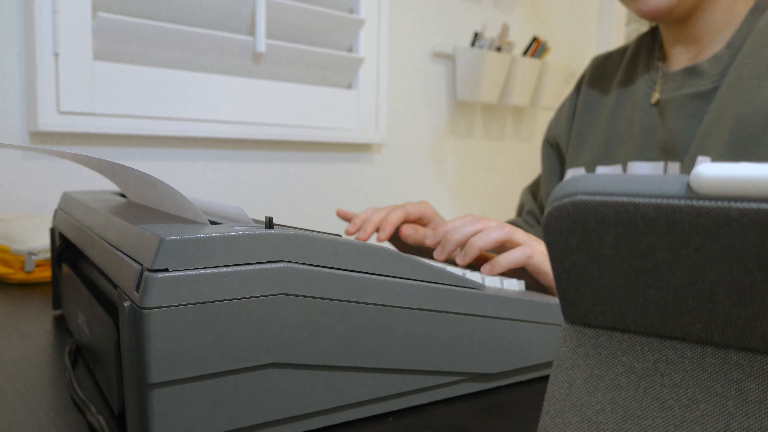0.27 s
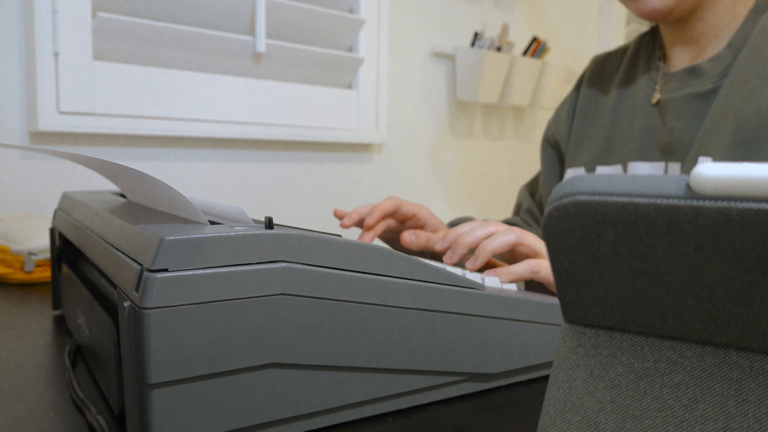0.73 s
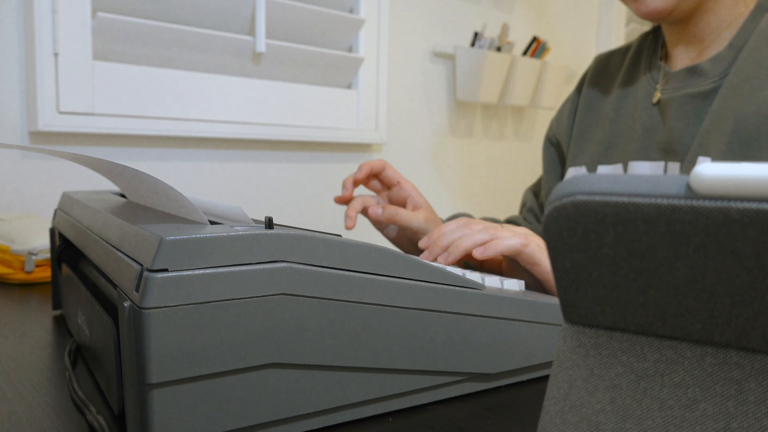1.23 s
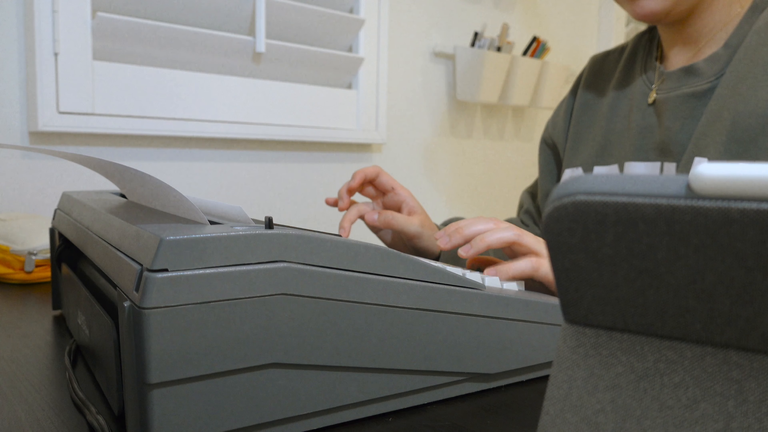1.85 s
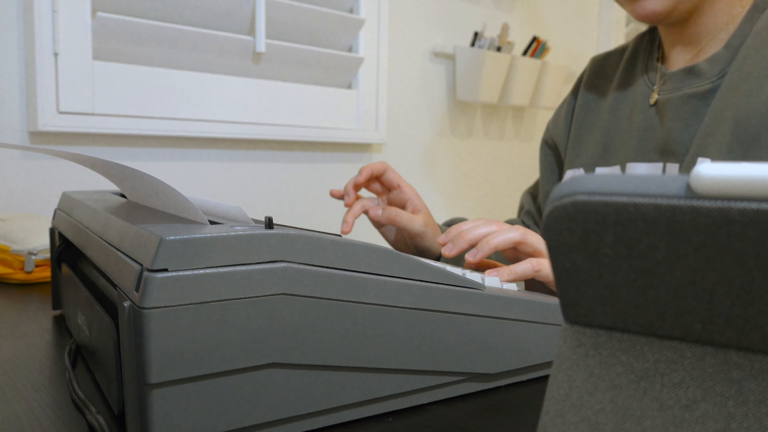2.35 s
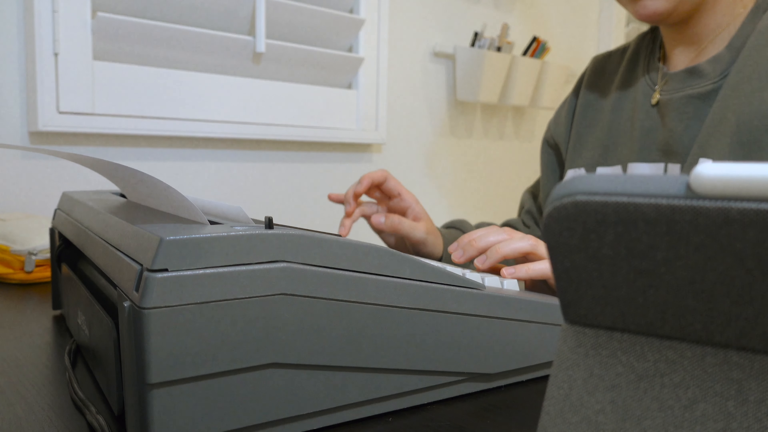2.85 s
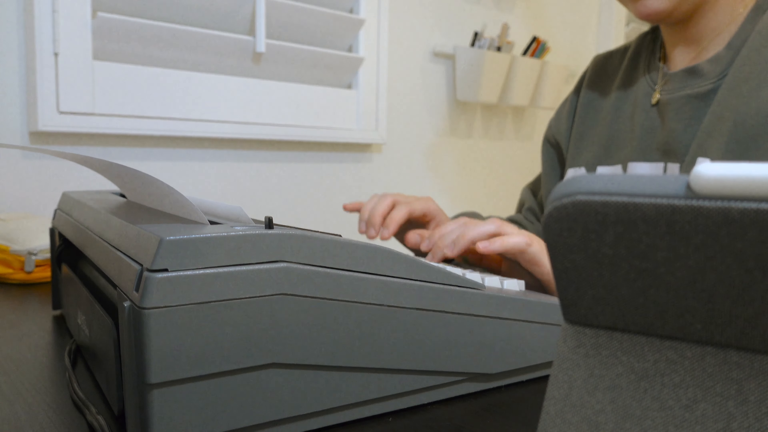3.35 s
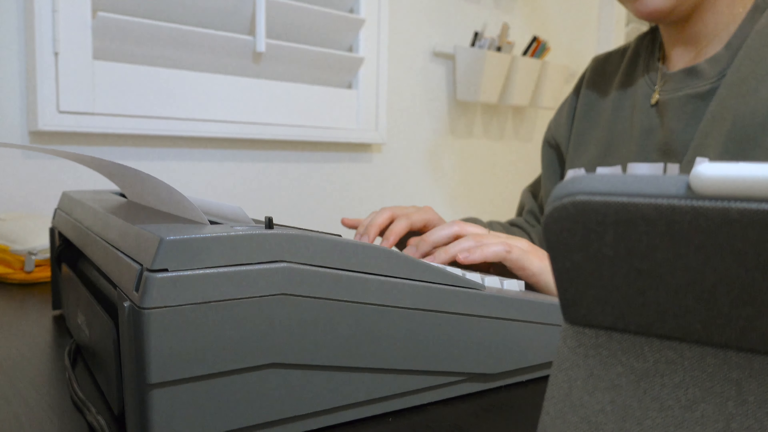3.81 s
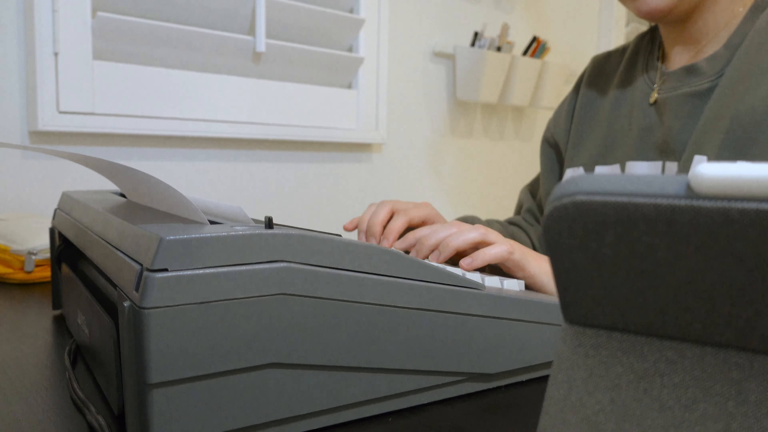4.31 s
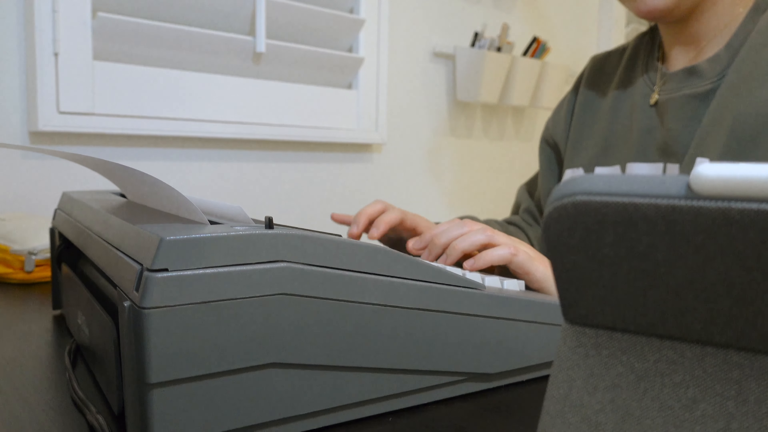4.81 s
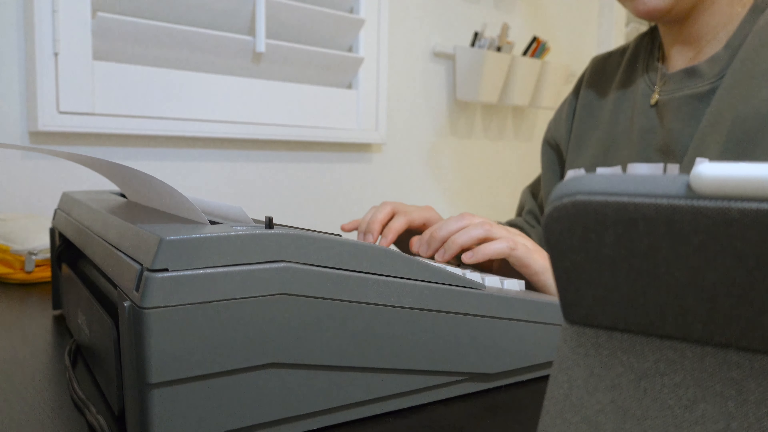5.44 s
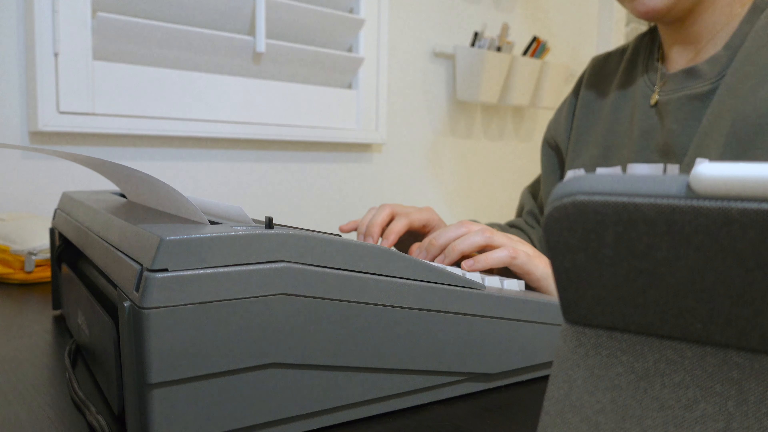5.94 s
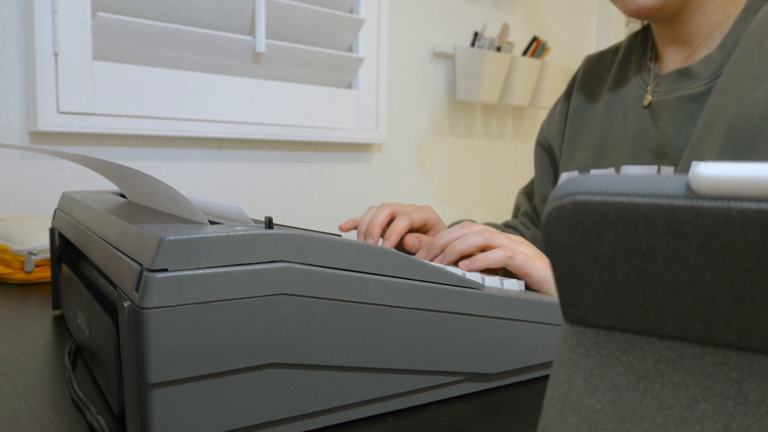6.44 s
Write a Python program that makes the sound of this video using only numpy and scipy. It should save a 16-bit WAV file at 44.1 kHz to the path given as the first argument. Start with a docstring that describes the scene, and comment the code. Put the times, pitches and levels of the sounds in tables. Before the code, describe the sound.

An electric typewriter strikes once, pauses with soft key clicks, then clatters through a quick, uneven run of letters in a small quiet room.

```python
"""A small quiet room, with an electric typewriter on a desk close to a stereo microphone.
Keys click; the hammer strikes and rebounds. Each impact excites damped modes of the casing and
desk, and a rattle of modes too dense to resolve. A stepper motor moves the carriage on with a
buzzing train of pushes. The room reverberates, and a rod in the machine keeps ringing through
the pauses, over a faint hush."""
import sys
import numpy as np
from scipy import signal
from scipy.fft import rfft, irfft, next_fast_len
from scipy.io import wavfile
from scipy.ndimage import uniform_filter1d

SR = 44100
rng = np.random.default_rng(int(sys.argv[2]) if len(sys.argv) > 2 else 0)


def write(x):
    x = np.atleast_2d(x).T
    wavfile.write(sys.argv[1], SR, np.round(np.clip(x, -1, 1) * 32767).astype(np.int16))


N = 294147
LEAD = SR // 4  # samples computed before the scene opens
EARLY_BLOW_S = -.13  # this blow is still dying away at the opening

# hammer blows: start_s, strength_db, ring_high_hz, ring_low_hz
BLOWS = [(0.8707, -0.15, 2860, 1853), (3.1664, -2.04, 3067, 1200), (3.3824, .3, 2940, 1660),
         (3.8566, -0.32, 2846, 2024), (4.014, 0.83, 2823, 1754), (4.1504, 0.6, 2590, 1752),
         (4.2731, 0.1, 2616, 2040), (4.372, 0.69, 2670, 1235), (4.7606, 0.37, 2898, 1724),
         (4.9436, -.2, 2600, 1760), (5.041, 0.16, 2540, 1737), (5.3126, -0.22, 2597, 1694)]
# the contacts of one blow: delay_s, casing_db, thud_db, knock_db, crack_db, contact_s
STROKE = [(0, -1.5, -1.5, -5.5, -2, 0.0011), (.009, -4.5, 0.5, -0.5, -9.5, 0.0014),
          (0.0193, -13.5, -2, -11.5, -9, 0.00064), (0.0236, -4, -9.5, -11.5, -5, 0.0018),
          (0.051, -7.5, -7.5, -13, -12, 0.0023), (.06, -15.5, -20.5, -16, -14, 0.00077),
          (0.073, -13.5, -22, -11.5, -18.5, 0.0023)]
# keys and small parts: start_s, casing_db, pitch_hz, knock_re_casing_db, crack_re_casing_db
CLICKS = [(0.118, -37.5, 3340, -15, -5.5), (0.1278, -28.5, 3280, -11.5, -17), (0.2224, -35, 3410, -5, -12),
          (0.3043, -40, 3340, -21, -4.5), (0.6135, -43.5, 1710, -17, -8), (0.6325, -37, 3200, -13.5, -21.5),
          (0.6462, -25, 2264, -21.5, -13.5), (0.677, -33, 2000, -20.5, -14.5), (0.77, -31, 3170, -24, -5.5),
          (0.7831, -18.5, 2610, -24, -16), (0.8192, -18.5, 2800, -20.5, -13), (0.9745, -26, 898, -10, -29),
          (1.2464, -38.5, 2780, -15.5, -15.5), (1.598, -50.5, 1980, -15, -23), (1.822, -56, 2460, -7, -23),
          (1.8844, -46.5, 2310, -10, -15), (1.91, -33.5, 3260, -16, -27), (1.923, -31, 2810, -15, -16),
          (1.9705, -33, 2320, -13, -19), (2.376, -48.5, 3420, -8, -24), (2.399, -52.5, 2310, 1, -27),
          (2.4975, -37.5, 890, -7, -22), (2.552, -53, 920, -10, -18), (2.6574, -60, 904, -9, -15),
          (3.0791, -26, 2713, -31.5, -13.5), (3.0866, -17.5, 2913, -26, -11),
          (3.1154, -21.5, 2870, -17.5, -12.5), (3.3187, -17, 3280, -19, -2.5), (3.3327, -19, 3465, -18, -8),
          (3.5277, -22.5, 3360, -20, -15.5), (3.6076, -28.5, 2990, -10, -10), (3.7554, -53, 2950, -7, 0.5),
          (3.7933, -37, 1880, -13, -20), (3.8012, -22.5, 2730, -20.5, -13.5), (4.563, -30, 3900, -17, -7),
          (4.6759, -14.5, 3206, -27.5, -11), (4.6881, -24, 2956, -12.5, -4.5),
          (4.7083, -23.5, 2840, -13.5, -19.5), (4.857, -18.5, 3430, -14, -9),
          (4.8642, -18, 3910, -25.5, -7.5), (4.892, -16, 2850, -25, -10.5), (4.907, -19, 3100, -20.5, -12),
          (5.2584, -24, 2650, -12.5, -11), (5.8967, -56, 3320, -1.5, -24), (5.936, -52.5, 1520, -6, -24),
          (5.957, -50.5, 2240, -4, -22), (5.977, -47.5, 2870, 3.5, -9), (6.0914, -42, 3350, -12, -4),
          (6.097, -32.5, 3220, -13, -6)]
BLOW_DB = (-9, -27, -27.5, -17)  # the four parts: casing, thud of desk, knock of platen, crack of type
CLICK_THUD_DB, CLICK_CONTACT_S = -3, .0009  # thud relative to knock; length of the touch
def impacts():
    """Impact excitation: blows and clicks feed power to four parts and impulses to casing and desk."""
    blow_power, click_power = np.zeros((2, 4, N + LEAD))
    kicks = np.zeros((2, N + LEAD))
    for start_s, db, *_ in [(EARLY_BLOW_S, 0)] + BLOWS:
        for delay_s, *parts_db, contact_s in STROKE:
            add_contact(blow_power, kicks, start_s + delay_s, db + np.add(BLOW_DB, parts_db), contact_s)
    for start_s, db, _, knock_db, crack_db in CLICKS:
        levels_db = db + np.array([0, knock_db + CLICK_THUD_DB, knock_db, crack_db])
        add_contact(click_power, kicks, start_s, levels_db, CLICK_CONTACT_S)
    return blow_power, click_power, kicks


def add_contact(power, kicks, start_s, levels_db, contact_s):
    """Finite contact time: energy enters each part as a pulse, slowest for thud, fastest for crack."""
    t = np.arange(1500) / SR
    pulse = t * np.exp(-t / (contact_s * np.array([[1], [2.5], [1.5], [.3]])))
    at = LEAD + round(start_s * SR)
    power[:, at:at + len(t)] += gain_of(2 * levels_db)[:, None] * pulse / pulse.sum(axis=1, keepdims=True)
    kicks[:, at + round(contact_s * SR)] += gain_of(levels_db[:2])


def metallic_rings():
    """Free vibration: each click and each blow rings briefly at a bright, metallic pitch."""
    # start_s, level_db, pitch_hz, t60_s, rise_s; a click lasts 115 cycles
    rings = [(start_s, db - 3.5, hz, 115 / hz, CLICK_CONTACT_S) for start_s, db, hz, *_ in CLICKS]
    for start_s, strength_db, high_hz, low_hz in BLOWS:
        db = BLOW_DB[0] + strength_db
        rings += [(start_s, db - 7.5, high_hz, .1, .0012),
                  (start_s + .008, db - 11.5, low_hz, .062, .004),
                  (start_s + STROKE[3][0], db - 7, 1.2 * high_hz, .04, .0006)]  # the rebound
    out, t = np.zeros((2, N + LEAD)), np.arange(6000) / SR
    stereo_lags_s = .00009 * rng.uniform(-0.6, 1, len(rings))
    for (start_s, db, hz, t60_s, rise_s), lag_s in zip(rings, stereo_lags_s):
        envelope = gain_of(db - 60 * t / t60_s) * (1 - np.exp(-t / rise_s))
        at = LEAD + round(start_s * SR)
        out[:, at:at + len(t)] += envelope * np.sin(2 * np.pi * hz * (t + np.array([[0], [lag_s]])))
    return out


# spectra of the dense modes of casing, desk, platen and type: frequency_hz, relative_density_db
CASING_SPECTRUM = [(900, -36), (1500, -10.5), (1750, -6.5), (2200, -6), (2480, -4.5), (2610, -1.5),
                   (2720, -2), (2820, 1), (3000, -3.5), (3400, -1), (3900, -4), (4700, -11.5), (6000, -39)]
THUD_SPECTRUM = [(30, -30), (70, -22.5), (110, -18.5), (140, -1), (175, -18.5), (225, -4.5), (280, -7.5),
                 (320, -2.5), (355, -1), (400, -10), (450, 3), (520, -7.5), (620, -7.5), (900, -36)]
KNOCK_SPECTRUM = [(500, -29.5), (700, 0.5), (900, -2.5), (1200, 1), (1400, -5.5), (1900, -30.5)]
CRACK_SPECTRUM = [(3000, -22.5), (4500, 1), (6000, -1), (8200, -4.5), (10000, -5), (13000, -9),
                  (15500, -13), (17000, -37)]
# the same four parts: level_db, t60_s, room_db, room_t60_s, gear_noise_db, grain_db, low_cut_hz
PARTS = [(-8.5, 0.11, -11.5, 0.58, -8.5, -0.5, 900), (-0.5, 0.061, -9.5, 0.48, 1, 1.7, 18),
         (-2.5, 0.11, -9, .5, -10, 2.7, 440), (3, 0.065, -13.5, 0.46, -25, 2, 3300)]
SNAP_DB, SNAP_T60_S = 4.5, .007  # the first instant of a contact, over the rattle
AIR_DB_PER_KHZ = -0.44  # reflections come back duller
def rattle(blow_power, click_power, push):
    """Modal overlap: dense modes merge into a grainy, fast-dying noise with a smoother room tail."""
    out, size = 0, N + LEAD
    spectra = CASING_SPECTRUM, THUD_SPECTRUM, KNOCK_SPECTRUM, CRACK_SPECTRUM
    for blows, clicks, spectrum, part in zip(blow_power, click_power, spectra, PARTS):
        db, t60_s, room_db, room_t60_s, gear_db, grain_db, low_cut_hz = part
        heavy = gain_of(2 * db) * blows + gain_of(2 * (gear_db - 20)) * push ** 2
        light = gain_of(2 * db) * clicks
        grain = uniform_filter1d(rng.standard_normal(size), size=30)
        snap = gain_of(2 * SNAP_DB) * decay(heavy + light, SNAP_T60_S, rise_s=.00046)
        energy = snap + decay(heavy, t60_s, rise_s=.0014) + decay(light, t60_s, rise_s=.0013)
        direct = np.sqrt(energy) * gain_of(grain_db * grain / grain.std())
        direct = direct * stereo_noise(size, spectrum, COHERENCE)
        duller = [(hz, density_db + AIR_DB_PER_KHZ * hz / 1000) for hz, density_db in spectrum]
        reflected = gain_of(room_db) * np.sqrt(decay(heavy + light, room_t60_s, ROOM_RISE_S))
        reflected = reflected * stereo_noise(size, duller, COHERENCE)
        out = out + high_pass(direct + reflected, low_cut_hz, order=4)
    return out


# resonances of the casing: pitch_hz, relative_level_db, t60_s
CASING_MODES = [(907, -14.5, 0.1), (1226, -16.5, 0.13), (1712, -8.5, 0.066), (1984, -14.5, 0.094),
                (2450, -18, 0.054), (2664, 3, 0.03), (2900, -8, .06), (3175, -2.5, 0.047),
                (3270, -7.5, .04)]
def casing_ring(kicks):
    """Impulse response: every contact sets the high modes of the casing ringing."""
    return resonate(gain_of(10.5) * kicks[:1], CASING_MODES, rise_s=.00023)


# resonances of the desk: pitch_hz, relative_level_db, t60_s
DESK_MODES = [(124, -14, 0.072), (221, -9.5, 0.099), (281, 0, 0.15), (355.5, -5, 0.3), (446, -2, 0.12),
              (504, -8, 0.28), (597, -3, .07)]
def desk_ring(kicks, push):
    """Structure-borne sound: contacts and motor pushes drive the low modes of the desk."""
    force = gain_of(22) * kicks[1:] + gain_of(-20.5) * push
    return resonate(force, DESK_MODES, rise_s=.01)


# carriage moves with no blow: start_s, level_db
SPACES = [(.135, -35), (3.525, -33), (4.475, -34), (5.135, -34.5), (5.978, -36)]
ADVANCE_DELAY_S, ADVANCE_DB = .004, -35  # the move after each blow
MOVE_S, MEAN_STEP_HZ, HUM_DB = .088, 137.5, -7  # hum relative to push
def stepper_motor():
    """Periodic forcing: the motor jerks the carriage on with a train of pushes and hums at their rate."""
    blow_times_s = [EARLY_BLOW_S] + [row[0] for row in BLOWS]
    moves = SPACES + [(start_s + ADVANCE_DELAY_S, ADVANCE_DB) for start_s in blow_times_s]
    push, hum = np.zeros((2, N + LEAD))
    t = np.arange(round(MOVE_S * SR)) / SR
    steps = MEAN_STEP_HZ * t * (1 - 0.085 * (t / MOVE_S - 1))  # the steps slow a little
    for start_s, db in moves:
        envelope = gain_of(db) * signal.windows.tukey(len(t), .3)
        at = LEAD + round(start_s * SR)
        push[at:at + len(t)] += envelope * np.exp(-(steps % 1) / 0.13)
        hum[at:at + len(t)] += gain_of(HUM_DB) * envelope * np.sin(2 * np.pi * steps)
    return push, hum


# jolts that set the rod ringing anew: start_s, level_db, loss_db_per_s
ROD_JOLTS = [(0.0, -63, 16.5), (0.9, -52, 15), (2.0, -65.5, 38), (2.4, -66, 30), (2.66, -80, 35.5),
             (3.4, -49.5, 14), (4.4, -58.5, 50.5), (5.33, -52, 17), (6.05, -59, 32)]
ROD_HZ, ROD_RISE_S = 364.4, .03
def rod():
    """Light damping: one mode decays slowly from each jolt to the next; its level wavers a little."""
    t = np.arange(N) / SR
    jolts = np.transpose(ROD_JOLTS)
    latest = np.maximum(np.searchsorted(jolts[0], t) - 1, 0)
    start_s, db, loss_db_per_s = jolts[:, latest]
    level = uniform_filter1d(gain_of(db - loss_db_per_s * (t - start_s)), size=round(ROD_RISE_S * SR))
    waver_db = 0.5 * sum(np.sin(2 * np.pi * (hz * t + rng.random())) for hz in np.geomspace(3, 25, 8))
    return level * gain_of(waver_db) * np.sqrt(2) * np.sin(2 * np.pi * ROD_HZ * t)


# left-right likeness of the machine and its reflections: frequency_hz, correlation
COHERENCE = [(60, 1), (200, .999), (400, 1), (700, 0.92), (1500, 0.61), (3000, 0.54), (5000, -0.49),
             (9000, 0.37), (15000, -0.7)]
ROOM_T60_S, ROOM_RISE_S = .37, .019  # the rise lasts until the reflections are dense
def room(sound):
    """Reverberation: diffuse reflections give the clear modes an exponentially decaying tail."""
    t = np.arange(SR // 2) / SR
    white = stereo_noise(len(t), [(20, 0), (20000, 0)], COHERENCE)
    tail = white * gain_of(-60 * t / ROOM_T60_S) * (1 - np.exp(-t / ROOM_RISE_S))
    tail = high_pass(tail, 170)  # thin walls let the bass out
    return convolve(sound.mean(0)[None], tail)


# background noise of the room: frequency_hz, relative_density_db
HUSH_SPECTRUM = [(35, -63), (60, -47), (323, -11.5), (354, -2.5), (398, -16), (682, -14.5), (822, -2.5),
                 (1250, -15.5), (1470, -8.5), (1580, -11), (3760, -19.5), (5460, -19.5), (16000, -23.5)]
# its left-right likeness: frequency_hz, correlation
HUSH_COHERENCE = [(100, 0.96), (400, 0.54), (800, .2), (1500, .01)]
def hush():
    """Stationary noise: a faint, steady floor under the machine."""
    return gain_of(-64.5) * stereo_noise(N, HUSH_SPECTRUM, HUSH_COHERENCE)


def gain_of(db):
    """Decibels to amplitude ratio; doubling the decibels gives the power ratio."""
    return 10 ** (np.asarray(db) / 20)


def curve_at(points, hz):
    """Interpolation on a logarithmic frequency axis."""
    points_hz, values = np.transpose(points)
    return np.interp(np.log(hz + 1), np.log(points_hz + 1), values)


def high_pass(sound, hz, order=2):
    """Butterworth filtering: the level falls away below the cutoff."""
    return signal.sosfilt(signal.butter(order, hz, "high", fs=SR, output="sos"), sound)


def stereo_noise(length, spectrum, coherence):
    """Partial coherence: two channels of coloured noise, alike in the bass and less so in the treble."""
    size = next_fast_len(length)
    hz = np.fft.rfftfreq(size, 1 / SR)
    left, independent = rfft(rng.standard_normal((2, size)))
    correlation = curve_at(coherence, hz)
    right = correlation * left + np.sqrt(1 - correlation ** 2) * independent
    pair = irfft(np.array([left, right]) * gain_of(curve_at(spectrum, hz)), size)
    return pair[:, :length] / np.sqrt(np.mean(pair ** 2))


def convolve(drive, response):
    """Linear response: the drive convolved with an impulse response scaled to unit energy."""
    energy = np.mean(np.sum(response ** 2, axis=1))
    return signal.oaconvolve(drive, response / np.sqrt(energy), axes=1)[:, :drive.shape[1]]


def resonate(force, modes, rise_s):
    """Modal superposition: a force excites damped sines; high ones reach the channels out of phase."""
    hz, db, t60_s = np.transpose(modes)[:, :, None]
    t = np.arange(SR // 3) / SR
    phase = 2 * np.pi * hz * t + rng.uniform(0, 2 * np.pi, hz.shape)
    phase_lag = np.arccos(curve_at(COHERENCE, hz)) * rng.choice([-1, 1], hz.shape)
    envelope = gain_of(db - 60 * t / t60_s) * (1 - np.exp(-t / rise_s))
    response = np.array([(envelope * np.sin(phase + lag)).sum(0) for lag in (0, phase_lag)])
    return convolve(force, response)


def decay(power, t60_s, rise_s):
    """Energy decay: power fed in builds up briefly, then dies away exponentially."""
    t = np.arange(SR) / SR
    shape = gain_of(-120 * t / t60_s) * (1 - np.exp(-t / rise_s))
    return abs(signal.oaconvolve(power, shape)[:len(power)])


def scene():
    """Superposition: rattle, modes, motor and reverberation add up over the hush and the rod."""
    blow_power, click_power, kicks = impacts()
    push, hum = stepper_motor()
    clatter = rattle(blow_power, click_power, push)
    ringing = casing_ring(kicks) + metallic_rings()
    desk = desk_ring(kicks, push)
    reverberation = gain_of(-15) * room(ringing) + gain_of(-16.5) * room(desk)
    typewriter = clatter + ringing + desk + hum + reverberation
    balance = gain_of([[.3], [-.3]])  # slightly to the left
    return typewriter[:, LEAD:] * balance + hush() + rod()


def record(dry):
    """Band limiting: the microphone drops the deep bass, and a low-pass removes the highest treble."""
    low_pass = signal.firwin(511, 16500, window=("kaiser", 9), fs=SR)
    return signal.oaconvolve(high_pass(dry, 85), low_pass[None], "same")


dry = scene()
out = record(dry)
write(out)
```